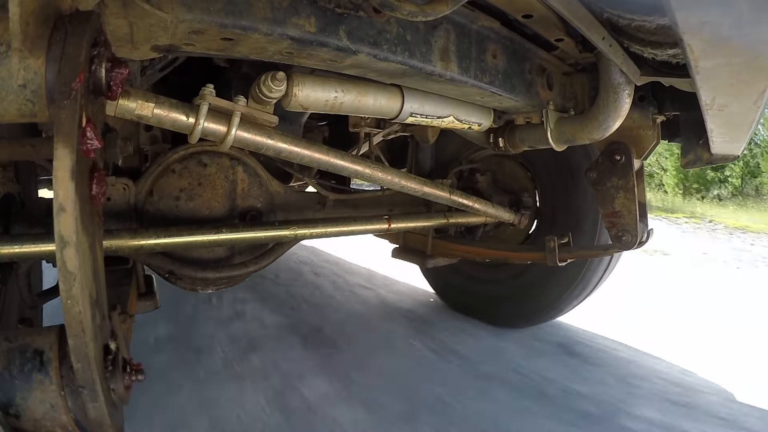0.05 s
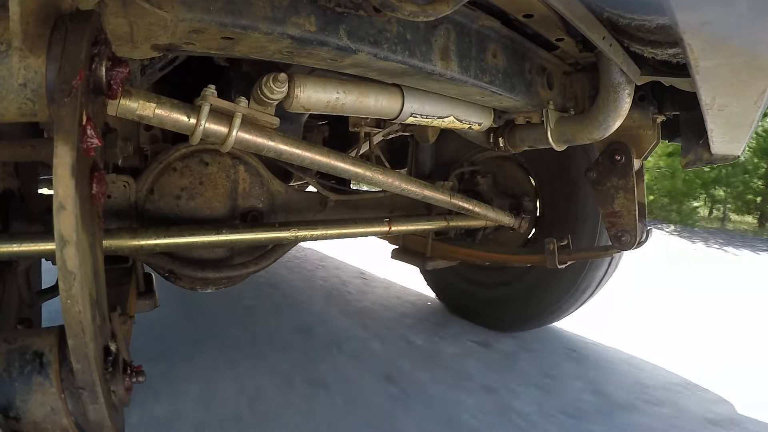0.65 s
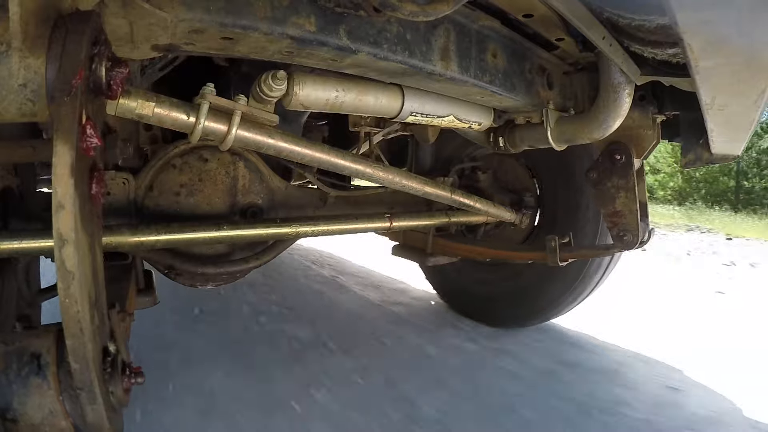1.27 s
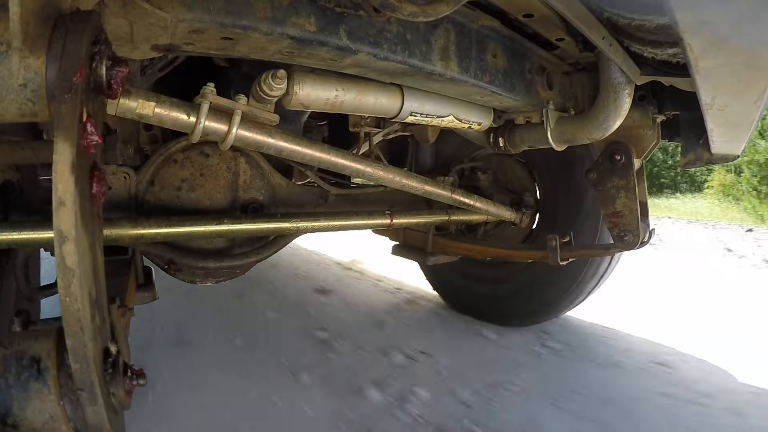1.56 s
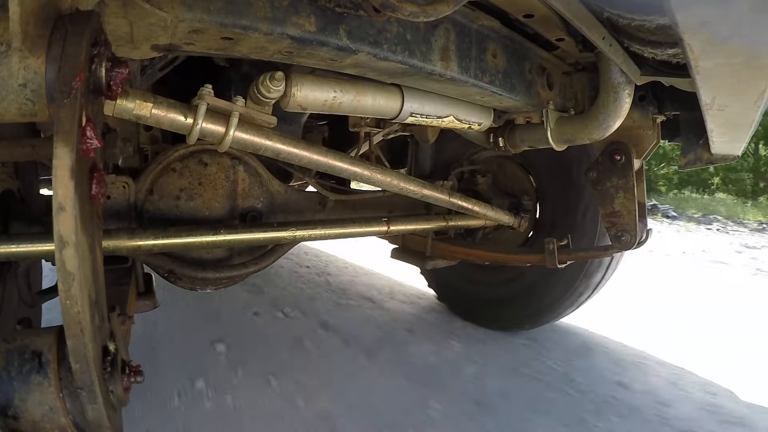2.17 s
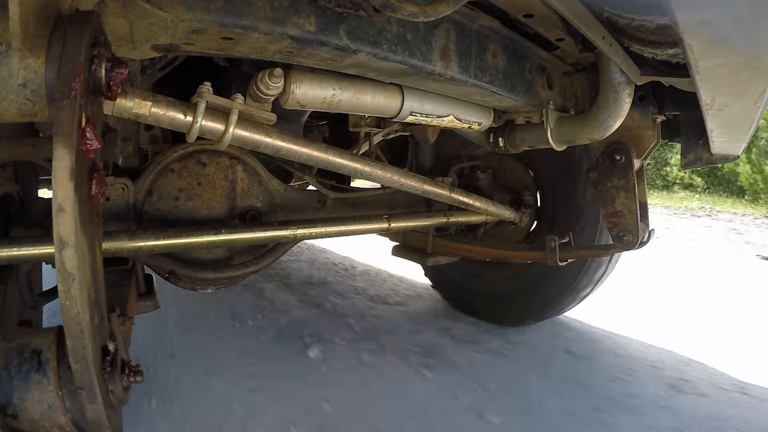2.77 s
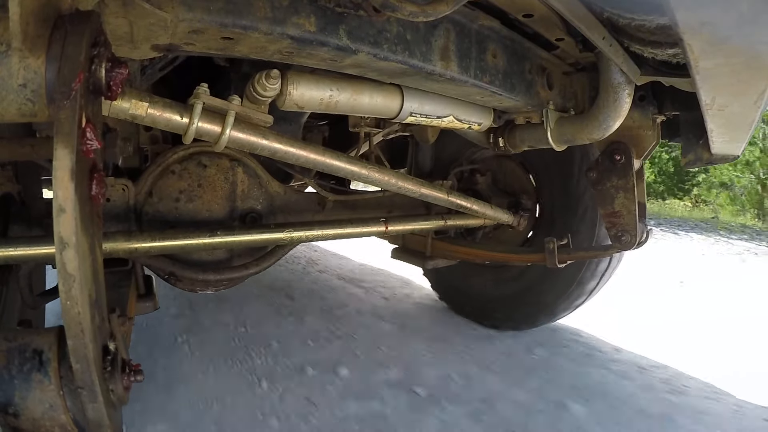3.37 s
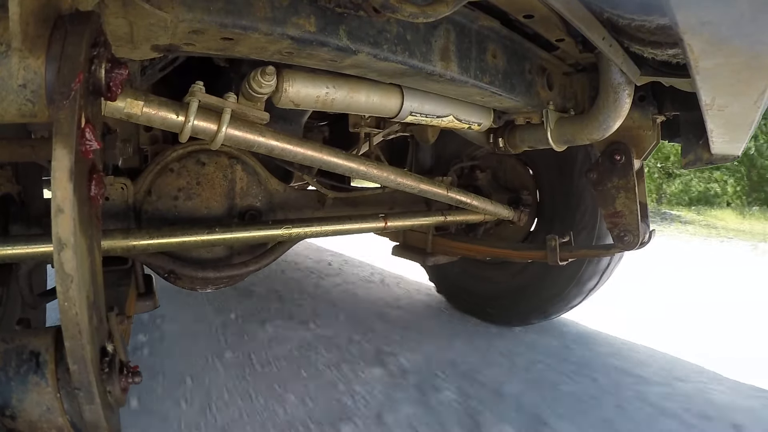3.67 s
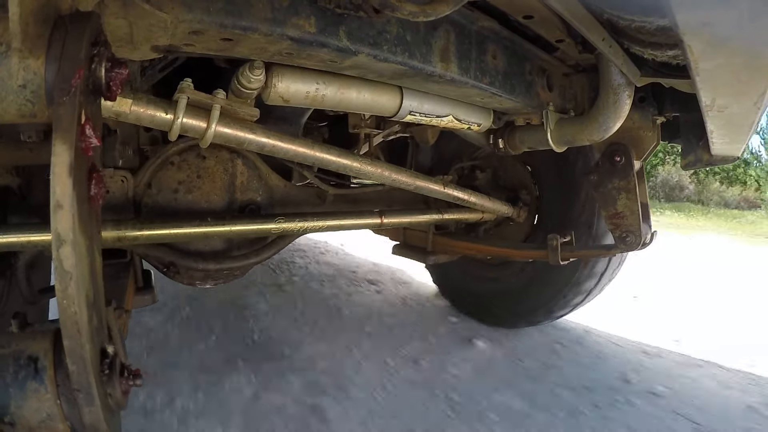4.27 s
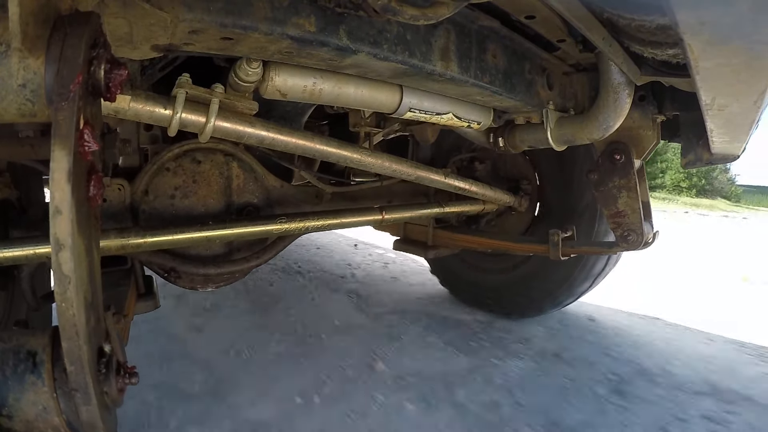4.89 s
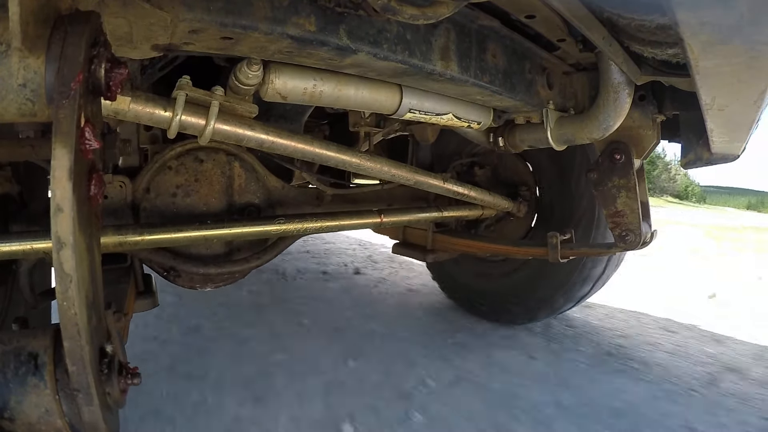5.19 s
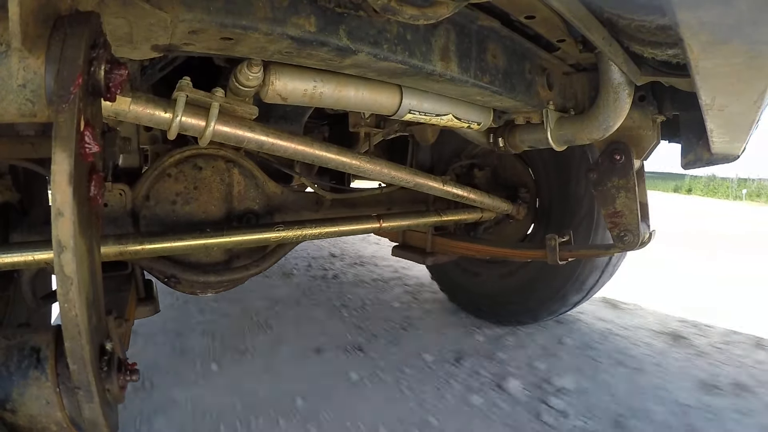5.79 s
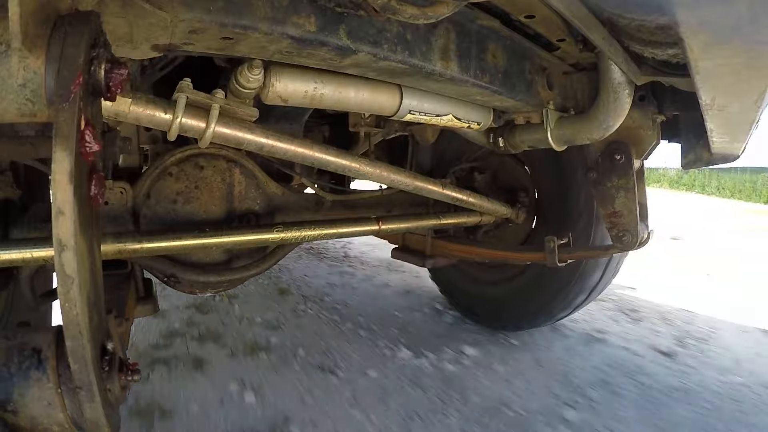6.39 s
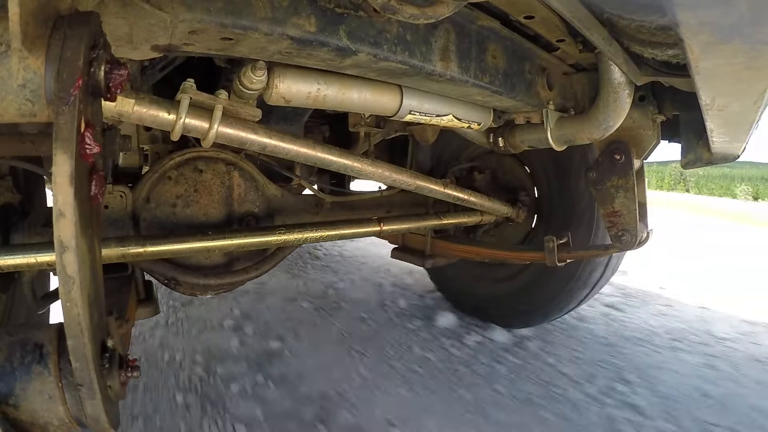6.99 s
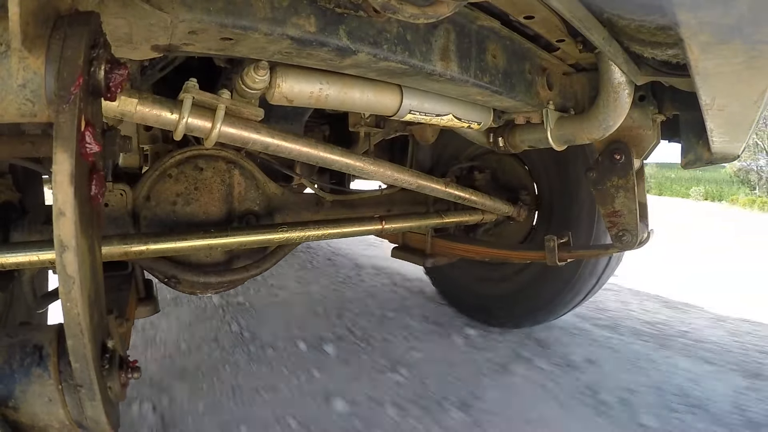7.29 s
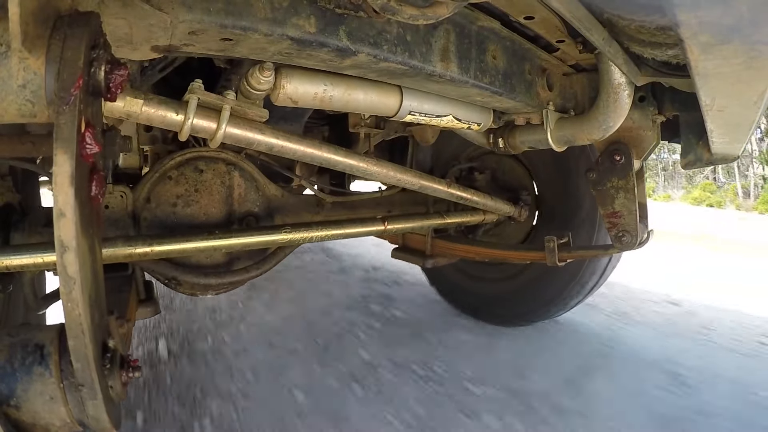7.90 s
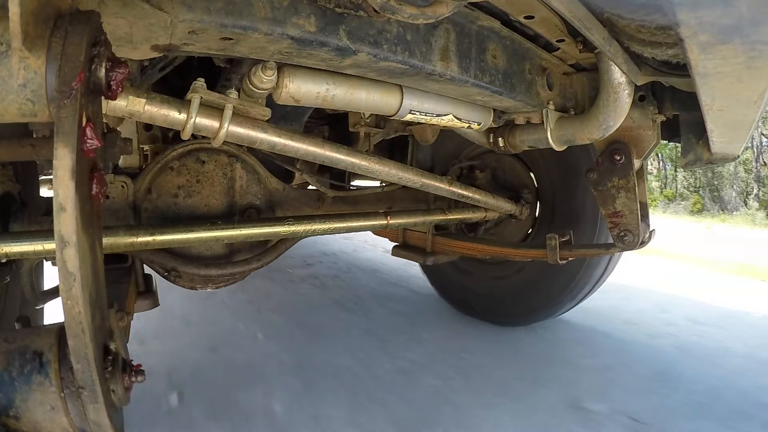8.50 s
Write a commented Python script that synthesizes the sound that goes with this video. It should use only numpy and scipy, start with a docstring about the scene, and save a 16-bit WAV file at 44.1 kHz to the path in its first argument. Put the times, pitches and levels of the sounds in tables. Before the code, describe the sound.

A four-wheel drive rumbles over gravel, heard from underneath, with stones clanking on steel before the engine pulls harder.

```python
"""A four-wheel drive on a gravel road, heard from a closed housing under its rear axle.
The road shakes frame, tyres and floor panel; the tread crunches gravel and sprays sand.
Bumps knock the axle, flung stones ring the underbody steel, chips rattle a bracket.
Midway the floor booms once. Then the engine pulls harder: its exhaust note rises and a
faint turbo whistle climbs with it."""
import sys
import numpy as np
from scipy import signal
from scipy.fft import rfft, irfft, next_fast_len
from scipy.io import wavfile
from scipy.ndimage import uniform_filter1d, minimum_filter1d

SR = 44100
rng = np.random.default_rng(int(sys.argv[2]) if len(sys.argv) > 2 else 0)


def waveform_to_disk(signal):
    """Save audio, clipped to [-1, 1], as 16-bit WAV at the path in sys.argv[1]."""
    frames = np.transpose(np.atleast_2d(signal))
    scaled = np.clip(frames, -1, 1) * 32767
    samples = np.round(scaled).astype(np.int16)
    wavfile.write(sys.argv[1], SR, samples)


N = 381465

# frame rumble, tyre boom, floor panel drone: (time [s], level [dB])
FRAME_LEVEL = [(0.0, -15), (0.7, -13), (1.0, -17), (1.2, -15), (2.0, -16), (2.3, -14.5), (3.1, -16.5),
               (3.5, -13), (3.6, -15), (4.0, -12.5), (4.7, -16), (5.3, -13.5), (5.6, -13), (5.8, -14),
               (6.3, -12.5), (6.6, -13.5), (7.1, -15.5), (7.7, -16), (8.65, -18.5)]
BOOM_LEVEL = [(0.0, -16), (1.3, -17.5), (1.45, -11), (1.7, -18), (1.9, -10.5), (2.0, -18.5), (2.2, -12),
              (2.5, -19.5), (2.75, -12), (2.85, -15), (3.45, -15.5), (3.8, -24.5), (4.45, -16.5),
              (6.45, -19.5), (6.55, -17), (7.05, -22.5), (7.6, -17.5), (8.15, -15), (8.65, -18.5)]
PANEL_LEVEL = [(0.0, -25), (1.15, -20.5), (1.3, -23), (1.4, -19), (2.05, -18.5), (2.25, -25), (2.9, -20.5),
               (3.8, -25), (4.0, -19), (4.3, -22.5), (4.42, -15.5), (4.9, -19.5), (5.1, -22), (6.0, -25),
               (6.15, -20.5), (6.3, -32), (6.45, -22.5), (7.15, -26), (8.15, -22.5), (8.65, -23)]
# their spectra: (frequency [Hz], relative density [dB])
FRAME_SPECTRUM = [(10, -15), (22, -5), (32, 3.5), (47, 2.5), (62, 2.5), (80, 0.5), (100, -2), (120, -7.5),
                  (170, -35), (300, -54.5)]
BOOM_SPECTRUM = [(70, -19.5), (105, -1), (125, -0.5), (150, -3.5), (180, -6.5), (205, -14.5), (280, -28.5),
                 (450, -56.5)]
PANEL_SPECTRUM = [(120, -37.5), (185, -12), (225, 0), (255, -0.5), (305, -4), (345, -14.5), (420, -22),
                  (700, -47.5)]
# tread roar, gravel crunch, sand spray: (time [s], base level [dB])
TREAD_LEVEL = [(0, -24), (1.3, -25.5), (1.4, -21), (1.6, -23.5), (1.75, -29.5), (1.95, -24), (2.45, -30),
               (2.8, -25.5), (3.3, -30), (3.8, -31), (4.4, -29), (4.7, -31.5), (4.9, -35.5), (5.3, -29),
               (6.3, -32.5), (6.5, -27.5), (7.05, -31.5), (8.15, -28), (8.3, -30), (8.65, -28)]
CRUNCH_LEVEL = [(0.0, -37), (0.7, -40), (0.9, -40.5), (1.1, -42), (2.4, -43), (2.8, -40), (3.8, -42),
                (4.4, -43.5), (4.9, -46), (5.2, -43), (6.7, -39.5), (6.9, -41.5), (7.9, -40), (8.65, -42.5)]
SAND_LEVEL = [(0.0, -60), (0.7, -64), (0.9, -63.5), (1.3, -62), (1.8, -65), (2.7, -60.5), (3.6, -62),
              (5.6, -61.5), (5.8, -66), (6.5, -61.5), (8.65, -61)]
# their spectra: (frequency [Hz], relative density [dB])
TREAD_SPECTRUM = [(230, -32.5), (340, 3.5), (430, 1), (500, -0.5), (620, -2), (740, -4.5), (900, -8.5),
                  (1050, -17.5), (1180, -18.5), (1400, -27.5), (2000, -37.5), (3200, -62)]
CRUNCH_SPECTRUM = [(500, -16), (900, 4.5), (1150, 3), (1450, -0.5), (1800, -5.5), (2150, -14),
                   (2380, -14.5), (2650, -18.5), (2950, -26), (3300, -30), (4500, -33)]
SAND_SPECTRUM = [(2400, -22.5), (3100, -9), (3700, -5.5), (4400, -3.5), (5100, -2.5), (5800, -1),
                 (7200, -1), (8200, -6.5), (10000, -11.5), (11500, -18.5), (15000, -39.5)]
# engine speed and load: (time [s], firing rate [Hz], exhaust base level [dB])
ENGINE_RUN = [(0, 61.3, -32.5), (4.9, 57.65, -27.5), (5.7, 60.64, -20.5), (6.15, 64.2, -19.5),
              (6.45, 65.33, -20), (6.8, 64.66, -16.5), (7.1, 65.44, -15), (7.35, 67.18, -15),
              (7.7, 71.07, -16), (8.0, 72.9, -16.5), (8.65, 77.6, -15.5)]
# exhaust harmonics: (multiple of firing rate [-], gain [dB])
EXHAUST_HARMONICS = [(1, 3), (2, -6.5)]
# engine bay clatter: (frequency [Hz], relative density [dB])
CLATTER_SPECTRUM = [(450, -16), (700, 1), (900, 4.5), (1050, -10.5), (1400, -6.5), (1750, -7.5), (2130, -8),
                    (2450, -20), (3100, -33), (4500, -55)]
# loose gravel heaps: (start [s], length [s], roar and crunch lift [dB], spray lift [dB])
GRAVEL_HEAPS = [(0.13, 0.083, 2, -4), (0.427, 0.21, -1, 2), (1.05, 0.13, 3.5, -1), (3.84, 0.31, 4.5, 5),
                (4.178, 0.1, -1, 2), (4.247, 0.19, 6, 4.5), (5.138, 0.17, 3.5, 3), (7.79, 0.28, 2.5, 0.5)]
# suspension knocks: (time [s], relative level [dB], centre pitch [Hz])
AXLE_KNOCKS = [(0.271, -12.5, 625), (0.359, -17, 600), (0.435, -11, 480), (0.509, -10.5, 445),
               (0.671, -19, 705), (0.783, -10.5, 426), (1.159, -8, 560), (1.246, -13, 465),
               (1.307, -22, 650), (1.456, -11.5, 747), (2.025, -11.5, 520), (2.116, -15, 615),
               (2.299, -12, 534), (2.364, -17.5, 570), (3.104, -14, 480), (3.663, -9.5, 764),
               (3.938, -8, 590), (4.028, -12, 443), (4.06, -5, 660), (4.295, -13, 500), (4.327, -7.5, 427),
               (4.991, -14, 910), (5.217, -11.5, 530), (6.215, -12.5, 403), (6.555, -11.5, 430),
               (7.768, -12.5, 660), (7.855, -11, 423), (7.927, -14.5, 600), (8.016, -15, 457.4),
               (8.567, -13.5, 600)]
# modes of axle and underbody steel: (frequency [Hz], gain [dB], t60 [s])
AXLE_MODES = [(315.3, -3, 0.3), (444, -7, 0.068), (586, -4, 0.041), (746, 1, 0.017), (870, -4.5, 0.029)]
STEEL_MODES = [(444.4, 22, 0.18), (1083, 0.5, 0.097), (1186, 2, 0.083), (1427, -3.5, 0.12),
               (1510, -1, 0.066), (1590, -2.5, 0.1), (1830, -11.5, 0.059), (2180, -7.5, 0.11),
               (2370, -8, 0.13), (2630, -14, 0.069), (3000, -11.5, 0.055)]
# chips on a bracket: (time [s], relative tick level [dB], pitch [Hz], relative rattle level [dB])
CHIP_HITS = [(0.363, -49, 6000, -51), (0.62, -48, 6200, -48), (1.089, -49, 6000, -53),
             (1.119, -50, 6000, -56), (3.207, -46, 7000, -54), (4.442, -39.5, 6400, -37.5),
             (4.515, -38.5, 7700, -41), (4.615, -47, 7500, -56), (4.718, -49, 5000, -57),
             (4.888, -47, 6800, -47), (5.07, -50, 5000, -41), (5.613, -45, 4500, -52),
             (6.04, -48, 5000, -52), (6.433, -45, 4800, -48), (7.41, -47, 4500, -48)]
# stones on the underbody: (time [s], relative clank level [dB], relative tick level [dB],
# pitch that colours the upper ring [Hz])
STONE_HITS = [(0.418, -27, -58, 1200), (0.433, -22, -54, 1590), (0.506, -15.5, -45, 1800),
              (0.555, -20.5, -52, 1450), (0.682, -27, -60, 1610), (0.772, -21.5, -52, 1790),
              (0.844, -29, -58, 2190), (1.166, -21, -54, 1280), (1.395, -25.5, -53, 2300),
              (3.176, -26.5, -54, 1350), (3.923, -20.5, -57, 1150), (3.938, -18.5, -51, 1200),
              (3.962, -21, -51, 1440), (3.974, -26, -51, 1500), (4.003, -17, -43.5, 1500),
              (4.02, -20, -47, 1200), (4.05, -15.5, -47.5, 1120), (4.083, -28, -55, 1200),
              (4.119, -29, -54, 1200), (4.175, -27.5, -65, 1200), (4.215, -27.5, -59, 1470),
              (4.253, -24, -57, 1500), (4.295, -21.5, -50, 1640), (4.323, -29, -59, 1200),
              (7.988, -24.5, -53, 2300)]
# sand on the housing: (time [s], relative level [dB])
SAND_SPITS = [(3.331, -68), (3.93, -61), (5.27, -66), (5.6, -63), (8.0, -65)]
# chip, bracket, stone clank, stone tick, sand spit: (frequency [Hz], relative density [dB])
CHIP_SPECTRUM = [(1900, -10), (2300, 5), (2900, -4), (3600, -11), (4600, -0.5), (5900, -2.5), (6700, -4.5),
                 (7700, -3), (8700, -10.5), (10000, -20), (15000, -42.5)]
BRACKET_SPECTRUM = [(1200, -24), (1640, -6.5), (1880, -12.5), (2060, -2), (2130, 2), (2230, -5),
                    (2500, -18.5), (3200, -38)]
CLANK_SPECTRUM = [(250, -10.5), (450, 9), (800, 3), (1200, -2.5), (1700, -2), (2050, -4.5), (2400, -7),
                  (2750, -19.5), (3400, -30), (5000, -37.5)]
TICK_SPECTRUM = [(1800, -22), (3000, 1.5), (3500, -1), (4100, 4.5), (4900, 0.5), (5900, 3.5), (7400, 1),
                 (8400, -5), (10000, -24), (15000, -50.5)]
SPIT_SPECTRUM = [(7000, -3.5), (10000, 0.5), (15000, -2.5)]
# turbo boost: (time [s], pitch [Hz], whistle level [dB], intake hiss level [dB])
TURBO_RUN = [(0, 4300, -92.5, -80), (4.7, 4450, -90.5, -78.5), (5.1, 4550, -85, -66),
             (5.75, 4850, -80, -65.5), (6.0, 4980, -70, -65), (6.7, 5080, -71, -67.5),
             (6.92, 5150, -63, -68), (7.15, 5352, -72, -66.5), (7.35, 5900, -85.5, -65),
             (7.5, 6400, -72, -70), (7.7, 6720, -62, -68), (8.0, 7280, -63, -70), (8.2, 7560, -71, -74),
             (8.4, 7830, -68, -69), (8.65, 8170, -64, -66)]
# intake hiss: (frequency [Hz], relative density [dB])
INTAKE_SPECTRUM = [(4000, -21.5), (4380, 1.5), (4800, -2.5), (5100, 1), (5600, -5), (6300, -17)]
# housing resonances: (frequency [Hz], width [Hz], lift [dB])
HOUSING_MODES = [(430, 23, 2), (729, 12, 3.5), (1137, 34, 1.5), (1600, 90, 0.5), (2030, 43, 1.5),
                 (2370, 33, 2), (2930, 94, 4), (4400, 150, 0.5), (5800, 100, 1), (6100, 130, 2.5)]


def from_db(db):
    """Decibels to gain."""
    return 10 ** (np.asarray(db) / 20)


def unit_rms(x):
    """Scale to unit rms."""
    return x / np.sqrt(np.mean(x ** 2) + 1e-20)


def curves(rows):
    """Each column after time, interpolated per sample."""
    times_s, *columns = np.transpose(rows)
    return [np.interp(np.arange(N) / SR, times_s, column) for column in columns]


def drift(rate_hz):
    """Random wander, unit rms."""
    size = next_fast_len(N)
    hz = np.arange(size // 2 + 1) * SR / size
    spectrum = rfft(rng.standard_normal(size)) / (1 + (hz / rate_hz) ** 2)
    return unit_rms(irfft(spectrum, size)[:N])


def wavering(pitch_hz, width_hz):
    """Narrow noise band around a pitch."""
    phase = 2 * np.pi * np.cumsum(pitch_hz) / SR
    return drift(width_hz) * np.sin(phase) + drift(width_hz) * np.cos(phase)


def colour(x, spectrum, size=8192):
    """Minimum-phase filter with the given spectrum; white noise keeps its level."""
    hz, db = np.transpose(spectrum)
    log_hz = np.log(np.maximum(np.arange(size // 2 + 1) * SR / size, 1))
    outside = np.abs(log_hz - np.clip(log_hz, np.log(hz[0]), np.log(hz[-1])))
    gain = from_db(np.interp(log_hz, np.log(hz), db) - 40 * outside)
    cepstrum = irfft(np.log(gain))
    cepstrum[1:size // 2] *= 2
    cepstrum[size // 2 + 1:] = 0
    response = irfft(np.exp(rfft(cepstrum)))
    padded = np.concatenate([x[-size:], x])
    return signal.fftconvolve(padded, response / np.linalg.norm(response))[size:size + N]


def lowpass(x, cut_hz, order=2):
    """Butterworth low-pass."""
    return signal.sosfilt(signal.butter(order, cut_hz, fs=SR, output="sos"), x)


def emphasise(x, hz, width_hz, lift_db):
    """Lift one resonance."""
    radius = np.exp(-np.pi * width_hz / SR)
    poles = [1, -2 * radius * np.cos(2 * np.pi * hz / SR), radius ** 2]
    band = (1 - radius ** 2) / 2 * signal.lfilter([1, 0, -1], poles, x)
    return x + (from_db(lift_db) - 1) * band


def grains(per_s, spread_db):
    """Random pebble contacts, mostly small, a few big."""
    sizes = from_db(spread_db * np.minimum(rng.exponential(1, N), 4.5))
    signs = rng.choice([-1, 1], N)
    contacts = rng.random(N) < per_s / SR
    return unit_rms(sizes * signs * contacts)


def evened(x, settle_hz, amount):
    """Level the swings of a rumble so it sounds steady and compressed."""
    envelope = np.abs(signal.hilbert(x, next_fast_len(N))[:N])
    power = uniform_filter1d(envelope ** 2, int(SR / settle_hz))
    return unit_rms(x / power ** (amount / 2))


def strike(times_s, levels_db, centres_hz, modes, spread_db, focus_db_per_octave, detune=0):
    """Each blow rings all modes at scattered strengths, attenuated away from its centre pitch."""
    hz, mode_db, t60_s = np.transpose(modes)
    age_s = np.arange(SR // 3) / SR
    decays = np.exp(-np.log(1000) * np.outer(1 / t60_s, age_s))
    signs = (-1) ** np.arange(len(modes))
    out = np.zeros(N + len(age_s))
    for start_s, blow_db, centre_hz in zip(times_s, levels_db, centres_hz):
        strength, shift = rng.standard_normal((2, len(modes)))
        off_centre_db = focus_db_per_octave * np.abs(np.log2(hz / centre_hz))
        gains = signs * from_db(blow_db + mode_db - off_centre_db + spread_db * strength)
        rings = np.sin(2 * np.pi * np.outer(hz * (1 + detune * shift), age_s)) * decays
        out[int(start_s * SR):][:len(age_s)] += gains @ rings
    return out[:N]


def bursts(times_s, levels_db, t60_s, rise_hz):
    """Each impact sets off dense, fast-dying vibration."""
    impacts = np.zeros(N)
    np.add.at(impacts, (times_s * SR).astype(int), from_db(levels_db) ** 2)
    decay = np.exp(-2 * np.log(1000) / (t60_s * SR))
    power = signal.lfilter([1], [1, -decay], impacts + 1e-18)
    envelope = np.sqrt(np.abs(lowpass(power, rise_hz, order=1)))
    return envelope * rng.standard_normal(N)


def chassis(cavity_hz=178.3):
    """The road shakes frame, tyres, the air cavity inside them and the floor panel."""
    frame_db, = curves(FRAME_LEVEL)
    boom_db, = curves(BOOM_LEVEL)
    tread_db, = curves(TREAD_LEVEL)
    panel_db, = curves(PANEL_LEVEL)
    frame = evened(colour(rng.standard_normal(N), FRAME_SPECTRUM), settle_hz=21.5, amount=0.78)
    boom = evened(colour(rng.standard_normal(N), BOOM_SPECTRUM), settle_hz=7.6, amount=0.7)
    cavity = from_db(tread_db - 1.5) * wavering(np.full(N, cavity_hz), width_hz=48)
    contacts = grains(per_s=1500, spread_db=2.12)
    panel = evened(colour(contacts, PANEL_SPECTRUM), settle_hz=5.2, amount=0.32)
    return from_db(frame_db) * frame + from_db(boom_db) * boom + cavity + from_db(panel_db) * panel


def tyres():
    """The tread thuds over pebbles, grinds them and sprays sand and grit, in clumps."""
    tread_db, = curves(TREAD_LEVEL)
    crunch_db, = curves(CRUNCH_LEVEL)
    sand_db, = curves(SAND_LEVEL)
    patches = drift(rate_hz=27)
    pebbles = grains(per_s=2800, spread_db=2.5) * from_db(0.84 * patches)
    gravel = grains(per_s=6000, spread_db=2.5) * from_db(1.2 * patches)
    fine_spray = grains(per_s=14000, spread_db=1.6) * from_db(0.77 * patches)
    coarse_spray = grains(per_s=820, spread_db=4.2) * from_db(5.7 * drift(rate_hz=40))
    tread = from_db(tread_db) * unit_rms(colour(pebbles, TREAD_SPECTRUM))
    crunch = from_db(crunch_db) * unit_rms(colour(gravel, CRUNCH_SPECTRUM))
    sand = from_db(sand_db) * unit_rms(colour(fine_spray, SAND_SPECTRUM))
    grit = from_db(sand_db - 6) * unit_rms(colour(coarse_spray, CHIP_SPECTRUM))
    roar_lift_db, spray_lift_db = heaps()
    return from_db(roar_lift_db) * (tread + crunch) + from_db(spray_lift_db) * (sand + grit)


def engine():
    """The exhaust hums at the firing rate; each firing rattles the engine bay."""
    firing_hz, exhaust_db = curves(ENGINE_RUN)
    phase = 2 * np.pi * np.cumsum(firing_hz * (1 + 0.005 * drift(rate_hz=6))) / SR
    note = sum(from_db(db) * np.sin(multiple * phase) for multiple, db in EXHAUST_HARMONICS)
    exhaust = from_db(exhaust_db + 2 * drift(rate_hz=9.4)) * note
    clatter = colour(rng.standard_normal(N) * (1 + 0.3 * np.sin(phase)), CLATTER_SPECTRUM)
    return exhaust + from_db(0.74 * exhaust_db - 30.5) * clatter


def pipe_drone(resonance_hz=198.1):
    """The exhaust pipe resonates, louder under load."""
    _, exhaust_db = curves(ENGINE_RUN)
    return from_db(exhaust_db - 11.5) * wavering(np.full(N, resonance_hz), width_hz=38)


def heaps(ramp_share=0.87):
    """Ploughing through gravel heaps lifts tyre roar and spray: swell, hold, fade."""
    roar_db, spray_db = np.zeros((2, N))
    for start_s, length_s, roar_lift_db, spray_lift_db in GRAVEL_HEAPS:
        progress = (np.arange(N) / SR - start_s) / length_s
        swell = np.clip(2 * np.minimum(progress, 1 - progress) / ramp_share, 0, 1)
        roar_db += roar_lift_db * swell
        spray_db += spray_lift_db * swell
    return roar_db, spray_db


def suspension():
    """Bumps knock the axle against its rubber bushes: short, dull, pitched blows."""
    times_s, levels_db, centres_hz = np.transpose(AXLE_KNOCKS)
    blows = strike(times_s, levels_db, centres_hz, AXLE_MODES, spread_db=-1, focus_db_per_octave=13.5)
    return lowpass(blows, cut_hz=1200, order=4)


def chips(rise_s=0.002, t60_s=0.11):
    """Each chip ticks at its own pitch; the bracket it hits rattles faintly."""
    times_s, ticks_db, pitches_hz, rattles_db = np.transpose(CHIP_HITS)
    age_s = np.arange(SR // 5) / SR
    envelope = np.minimum(age_s / rise_s, 1) * np.exp(-np.log(1000) * age_s / t60_s)
    ticks = np.zeros(N + len(age_s))
    for start_s, tick_db, pitch_hz in zip(times_s, ticks_db, pitches_hz):
        burst = from_db(tick_db - 10.5) * envelope * rng.standard_normal(len(age_s))
        ticks[int(start_s * SR):][:len(age_s)] += emphasise(burst, pitch_hz, width_hz=1200, lift_db=10)
    rattle = bursts(times_s, rattles_db - 6, t60_s=0.21, rise_hz=100)
    return colour(ticks[:N], CHIP_SPECTRUM) + colour(rattle, BRACKET_SPECTRUM)


def stones():
    """Flung stones crack on the steel; where each lands colours the upper ring."""
    times_s, clanks_db, ticks_db, centres_hz = np.transpose(STONE_HITS)
    clank = bursts(times_s, clanks_db - 7, t60_s=0.065, rise_hz=600)
    tick = bursts(times_s, ticks_db + 5, t60_s=0.059, rise_hz=400) * grains(per_s=9000, spread_db=2.4)
    ring = strike(times_s, clanks_db - 9.5, centres_hz, STEEL_MODES,
                  spread_db=2.5, focus_db_per_octave=9.5, detune=0.035)
    return colour(clank, CLANK_SPECTRUM) + colour(tick, TICK_SPECTRUM) + lowpass(ring, cut_hz=3000)


def sand_spits():
    """Pinches of sand hit the housing: short, bright crackle."""
    times_s, levels_db = np.transpose(SAND_SPITS)
    spits = bursts(times_s, levels_db, t60_s=0.22, rise_hz=30)
    return colour(spits * grains(per_s=1200, spread_db=3), SPIT_SPECTRUM)


def floor_boom(start_s=4.34, rise_s=0.14, hold_s=0.06, level_db=-12.5, fall_db_per_s=198):
    """The big bump sets the floor booming: swell, hold, quick fall, pitch bending up."""
    start_hz, bend_hz_per_s = 236, 126
    age_s = np.maximum(np.arange(N) / SR - start_s, 0)
    fall_db = fall_db_per_s * np.maximum(age_s - rise_s - hold_s, 0)
    envelope = np.minimum(age_s / rise_s, 1) * from_db(level_db - fall_db)
    tone = wavering(start_hz + bend_hz_per_s * age_s, width_hz=12)
    return envelope * evened(tone, settle_hz=22, amount=0.79)


def turbo():
    """The intake hisses under load; an unsteady whistle climbs with the boost."""
    pitch_hz, whistle_db, hiss_db = curves(TURBO_RUN)
    whistle_gain = from_db(whistle_db + 1.2 * drift(rate_hz=16))
    whistle = wavering(pitch_hz * (1 + 0.004 * drift(rate_hz=16)), width_hz=160)
    hiss = colour(rng.standard_normal(N), INTAKE_SPECTRUM)
    return whistle_gain * whistle + from_db(hiss_db) * hiss


def housing(x):
    """The closed case around the microphone rings faintly."""
    for hz, width_hz, lift_db in HOUSING_MODES:
        x = emphasise(x, hz, width_hz, lift_db)
    return x


def scene():
    """Road and engine sounds through the housing, mono."""
    road = chassis() + floor_boom() + tyres() + stones() + chips() + sand_spits() + suspension()
    return housing(road + engine() + turbo() + pipe_drone())[None]


def record(dry):
    """Look-ahead limiter, end fades, treble cut."""
    ceiling_db, release_db_per_s, window_samples, fade_s = -1.3, 70, 221, 0.004
    over_db = np.maximum(20 * np.log10(np.abs(dry[0]) + 1e-9) - ceiling_db, 0)
    release_db = release_db_per_s * np.arange(N) / SR
    gain_db = release_db - np.maximum.accumulate(over_db + release_db)
    gain_db = uniform_filter1d(minimum_filter1d(gain_db, window_samples), window_samples)
    fades = signal.windows.tukey(N, 2 * fade_s * SR / N)
    return lowpass(dry * from_db(gain_db) * fades, cut_hz=15700, order=14)


dry = scene()
out = record(dry)
waveform_to_disk(out)
```